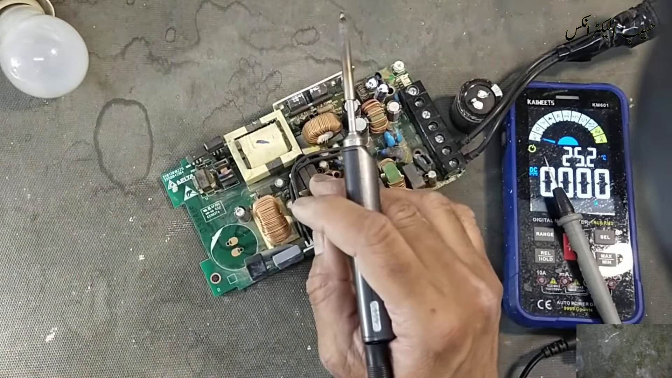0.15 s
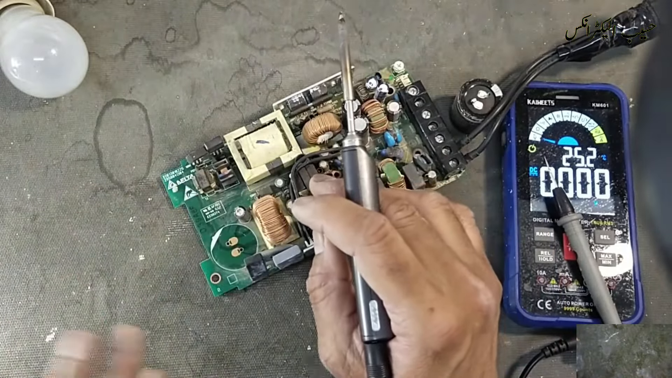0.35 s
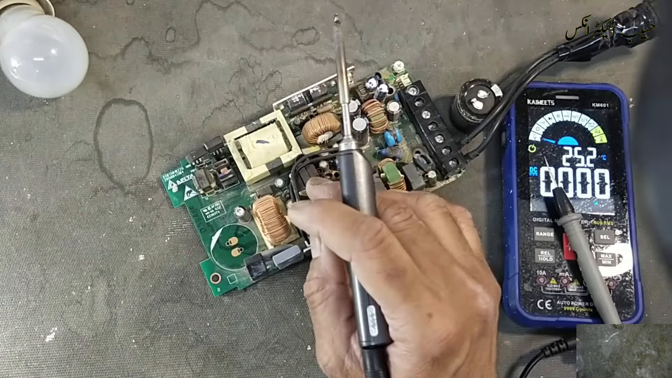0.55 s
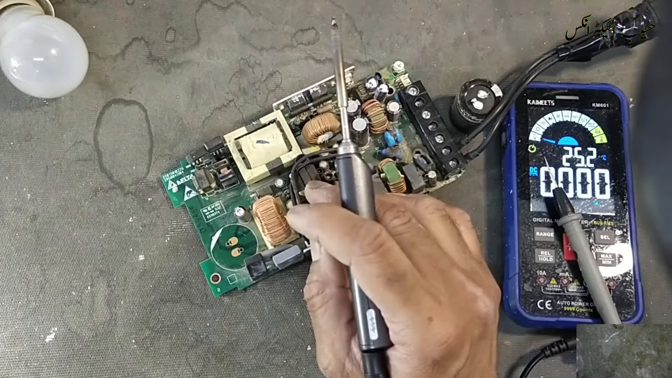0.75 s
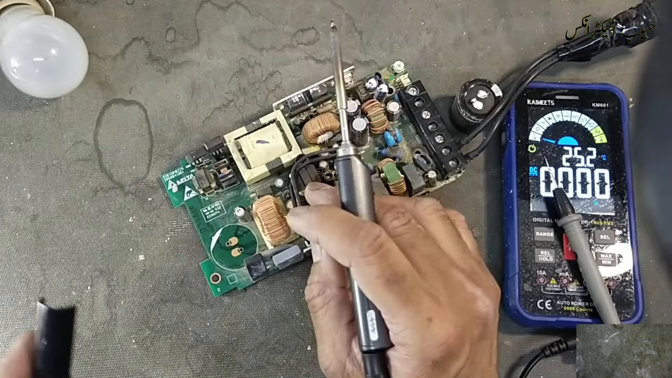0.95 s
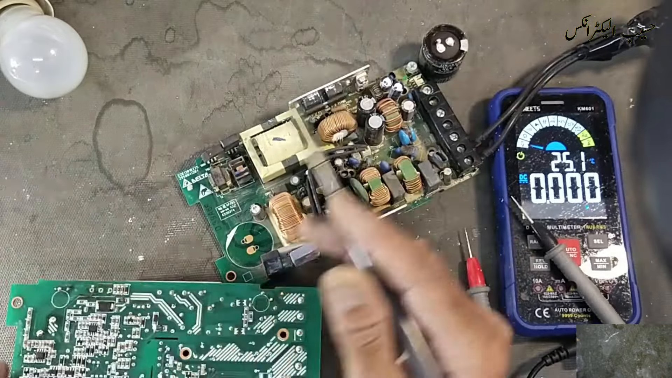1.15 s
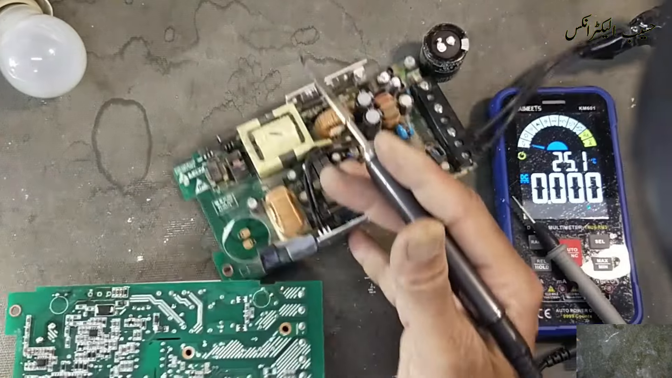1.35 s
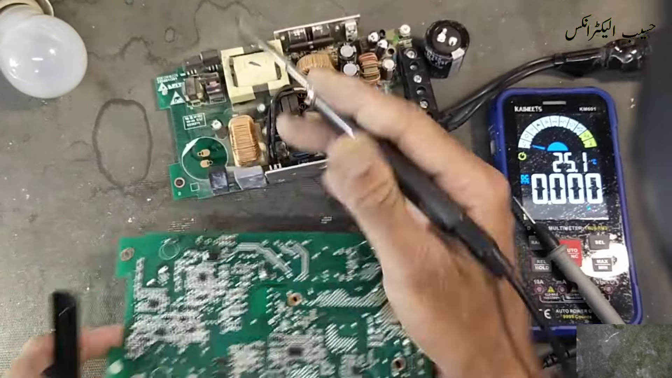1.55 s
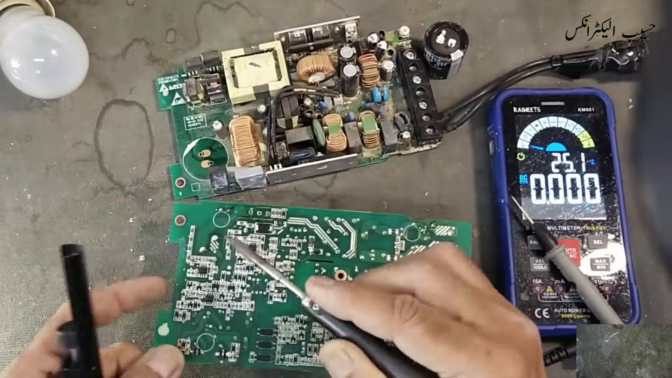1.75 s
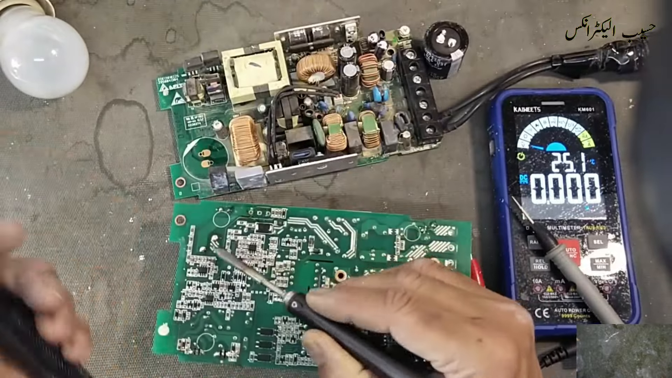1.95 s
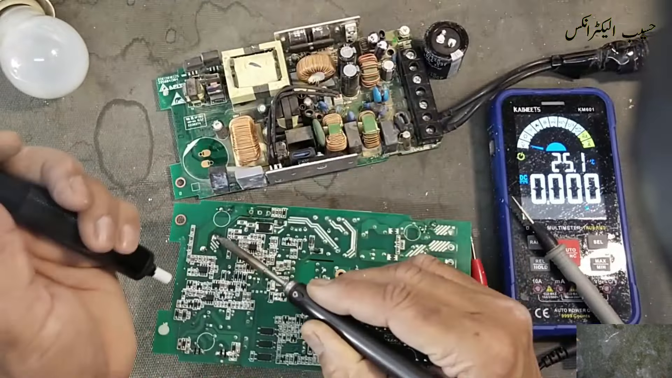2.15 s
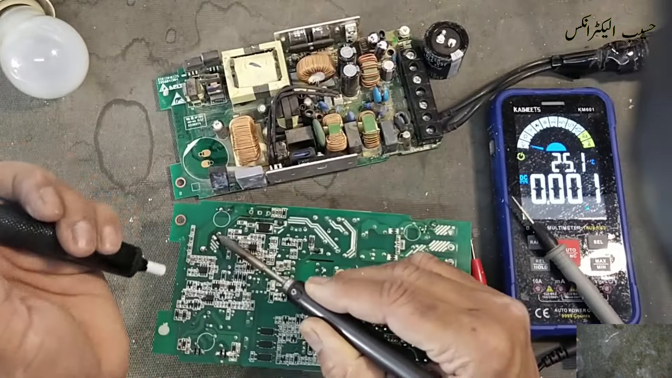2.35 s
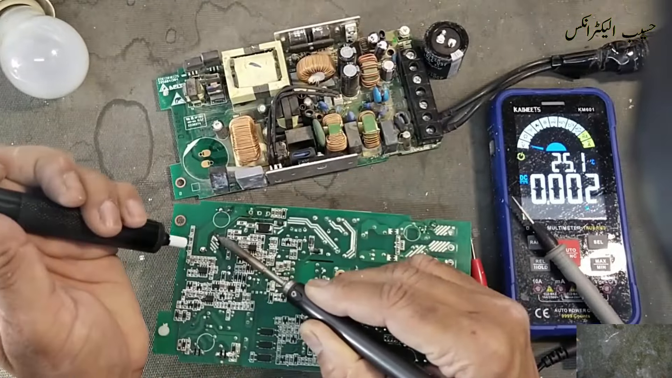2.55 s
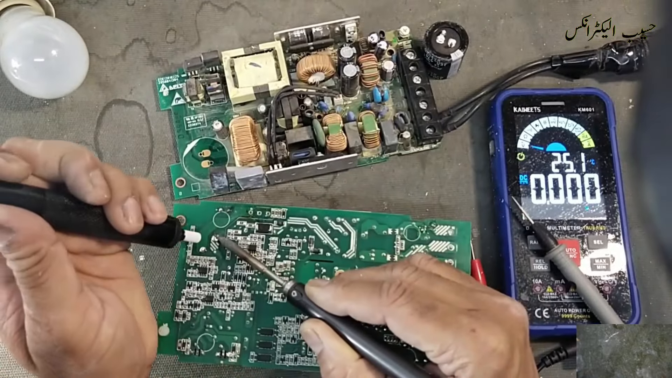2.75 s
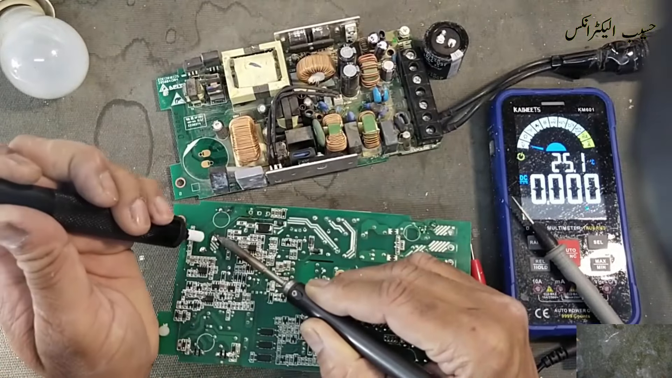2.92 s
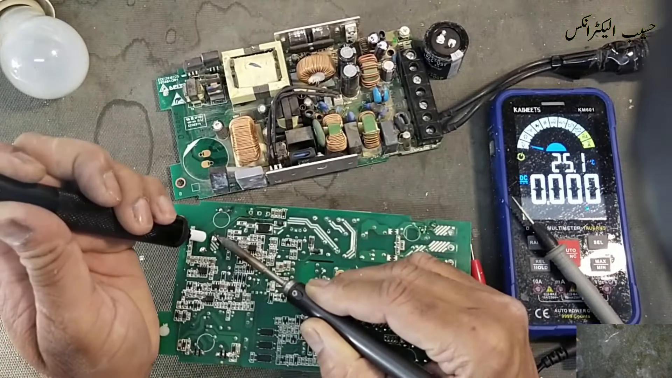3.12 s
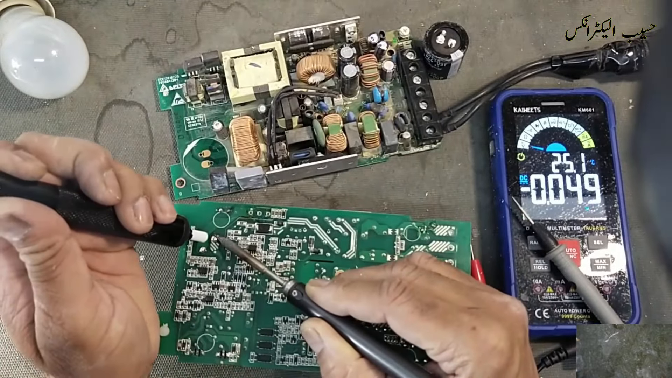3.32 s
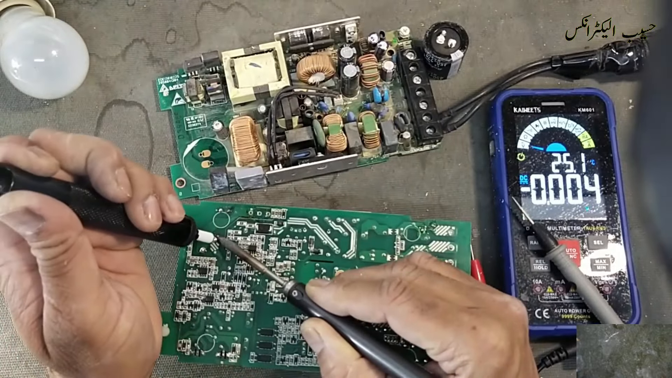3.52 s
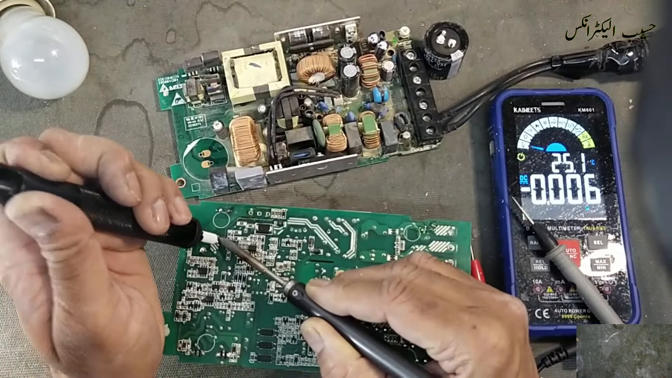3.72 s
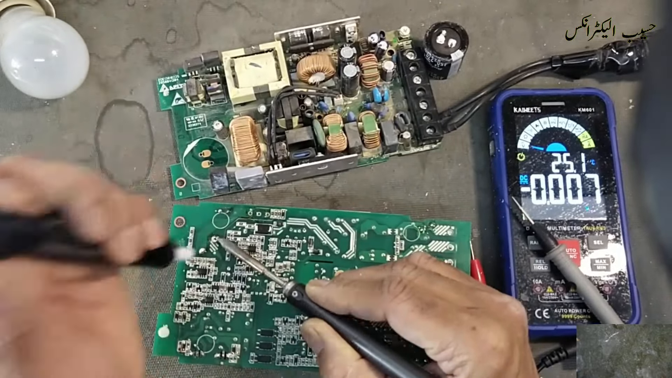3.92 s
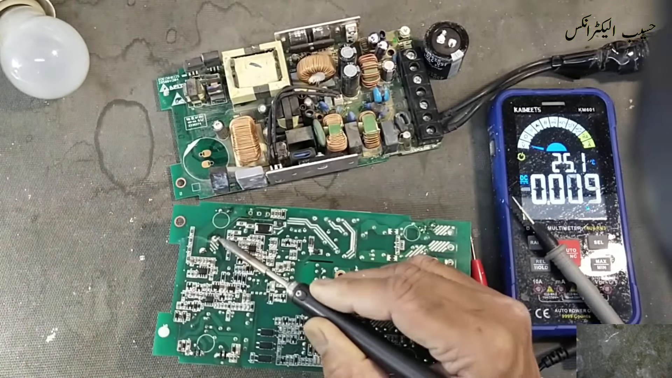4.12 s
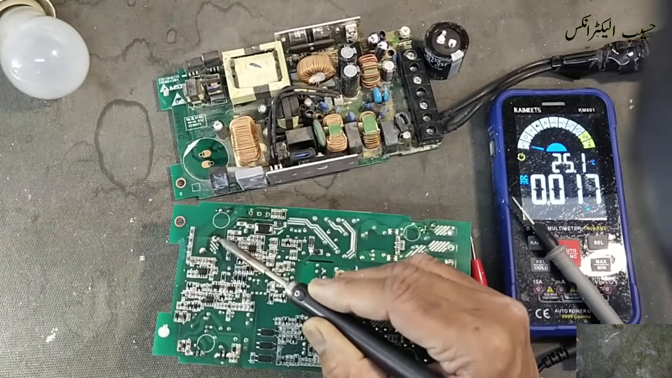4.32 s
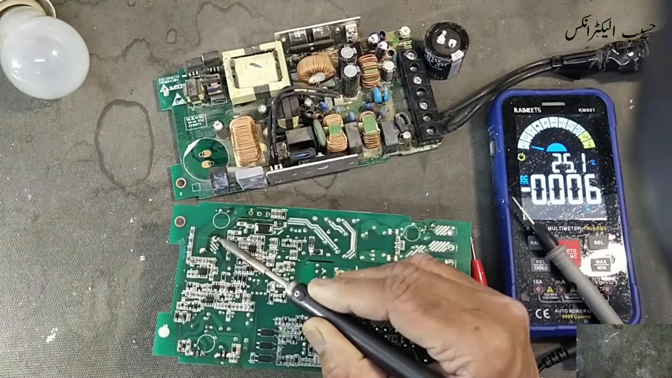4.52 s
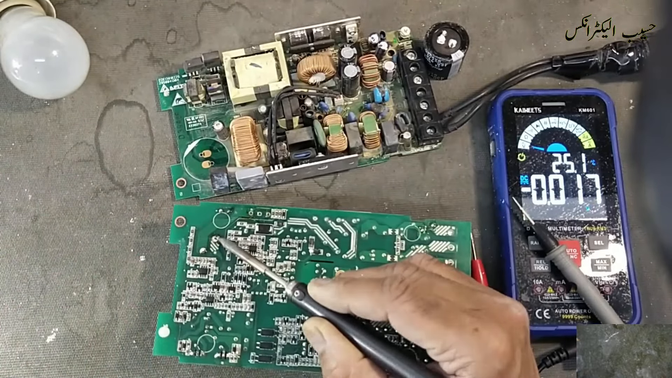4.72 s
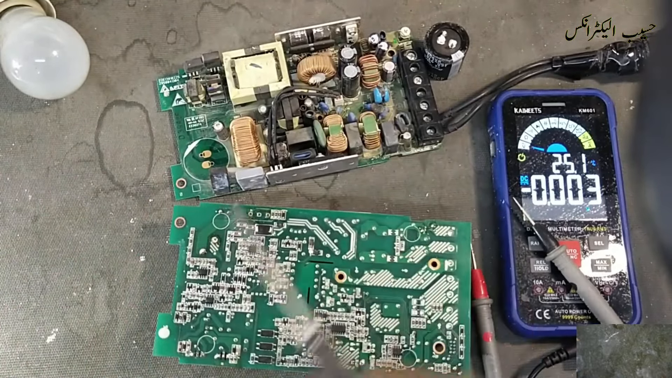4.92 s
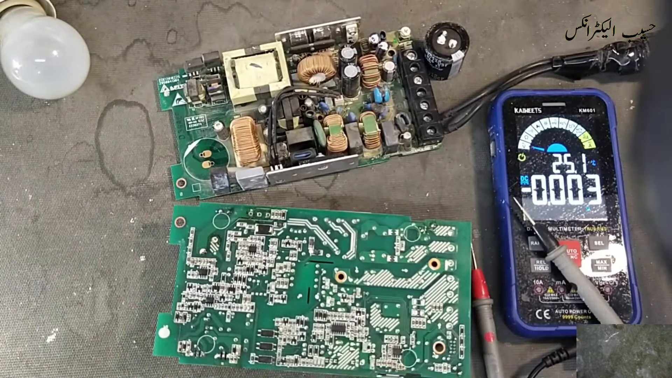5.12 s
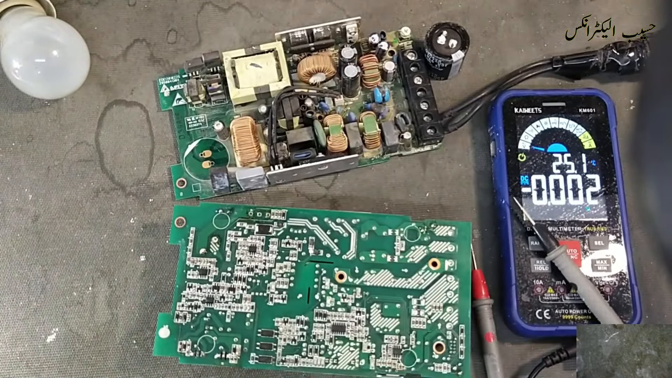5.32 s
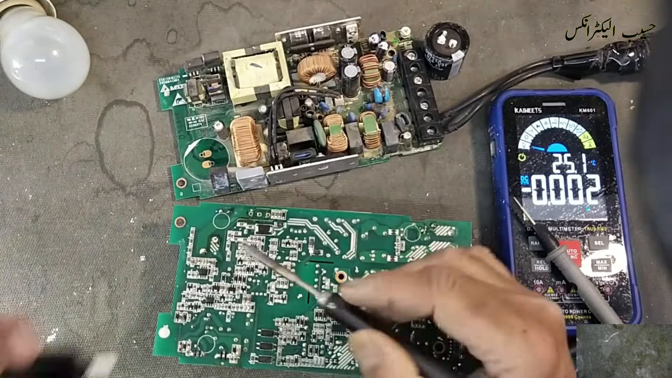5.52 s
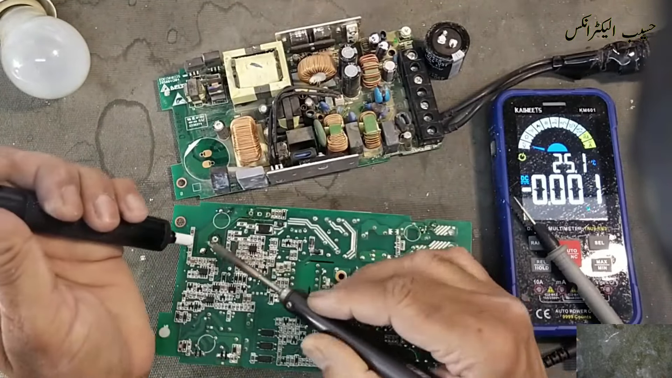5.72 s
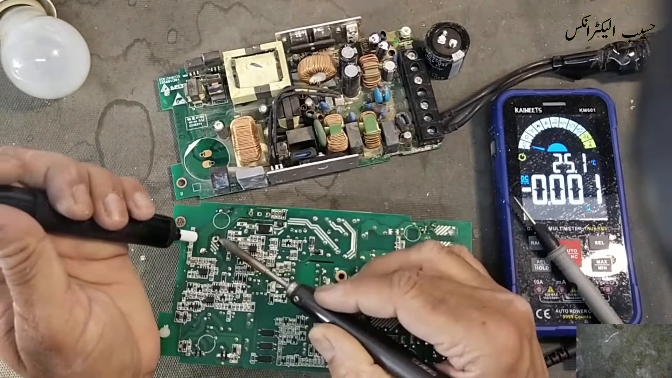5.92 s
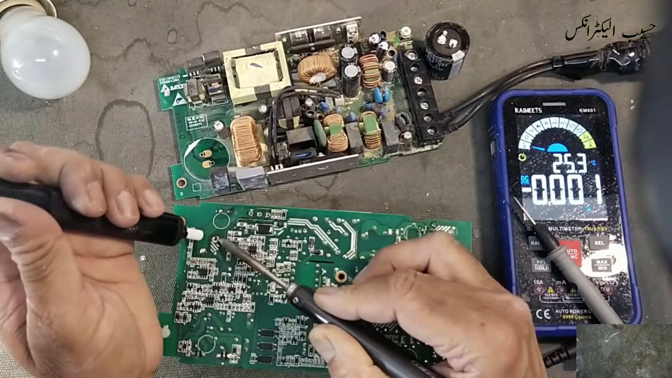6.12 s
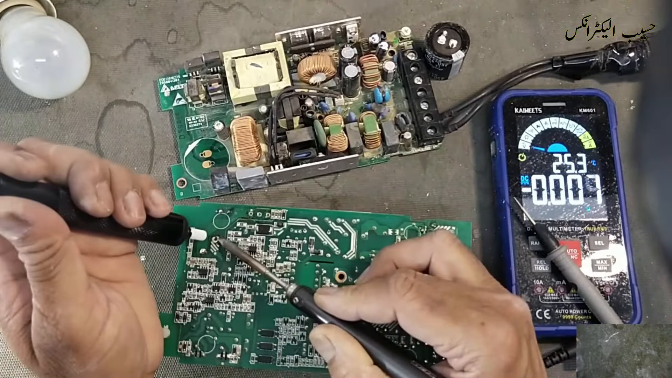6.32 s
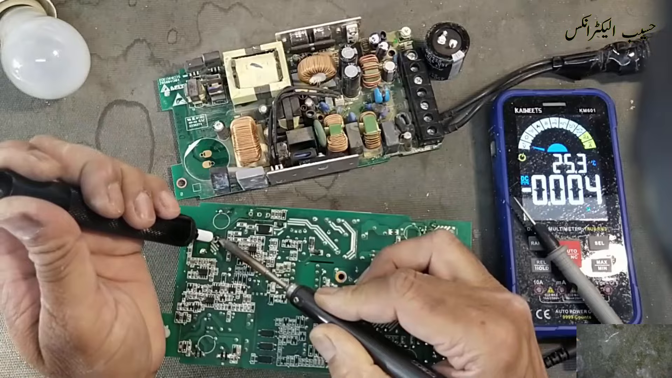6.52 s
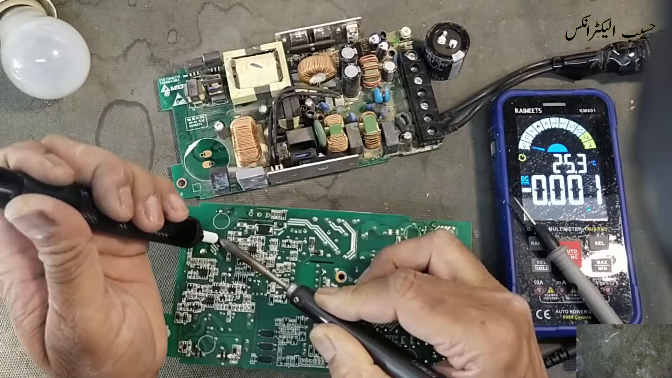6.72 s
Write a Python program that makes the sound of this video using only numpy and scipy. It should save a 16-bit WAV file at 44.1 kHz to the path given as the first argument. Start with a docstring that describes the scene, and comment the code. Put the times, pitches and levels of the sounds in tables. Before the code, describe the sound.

Close, dry stereo in a small quiet room with soft low air and a thin hiss. From 0 to 1 s, short gritty scrapes of board and tools on a bench mat, with light knocks around 0.4 s and a quick upward swipe near 0.5 s. Small bumps at 1.1-1.3 s; a raspy drag swells from 1.4 s into the heaviest thuds at 1.5 and 1.65 s, then a hollow ringing knock at 1.8 s. A faint tap at 2.3 s, then near silence. At 3.8 s a loud, very short pump snap, bright and plasticky, with spring rattle and a low bench boom. Tiny ticks and thin metallic pings from 3.9 to 4.6 s, taps at 4.8 s, a double latch click just before 5 s, and knocks to 5.5 s. Quiet, with a barely audible whistle and squeak after 6.3 s, until a much softer snap at 6.75 s.

```python
"""A circuit board drags over a workbench and is set down; then a spring-loaded desoldering pump snaps,
is pushed back until it latches, and snaps again, with taps and clinks in between.
Pump, latch, taps and slides are gritty noise shaped by force envelopes, spectra and resonances.
Bumps and recoil ring the bench as decaying sines; pins, nozzle and joint are gliding narrow noise.
A short noise tail makes the small room, over quiet air."""
import sys
import numpy as np
from scipy import signal
from scipy.fft import rfft, irfft, next_fast_len
from scipy.io import wavfile
from scipy.ndimage import uniform_filter1d

SR = 44100
rng = np.random.default_rng(int(sys.argv[2]) if len(sys.argv) > 2 else 0)


def wav_record(signal):
    """Record a signal, one row per channel, as 16-bit PCM in the file named by sys.argv[1]."""
    frames = np.transpose(np.atleast_2d(signal))
    bounded = np.clip(frames, -1, 1)
    # unit amplitude maps onto the largest positive 16-bit level
    quanta = np.round(bounded * 32767).astype(np.int16)
    wavfile.write(sys.argv[1], SR, quanta)


N = 298116
TIME = np.arange(N) / SR


def snap(strokes, spectrum, modes, rise_s, fall_s, grain_db, rattle_db, rattle_s):
    """The plunger scrapes along the barrel, sets the body ringing, and its spring rattles on unevenly."""
    force, rattle = 0, 0
    for s, db, length_s in strokes:
        force = force + from_db(db) * burst(TIME - s, length_s, rise_s, fall_s)
        rattle = rattle + from_db(db + rattle_db) * burst(TIME - s - length_s, 0, rise_s, rattle_s)
    scrape = force * grit(grain_db, grain_s=0.00042)
    spring = rattle * grit(grain_db=5, grain_s=0.0016)
    out = colour(scrape + spring, spectrum)
    for s, db, length_s in strokes:
        for hz, mode_db, t60_s in modes:
            phase = rng.uniform(0, 2 * np.pi, (2, 1))
            add(out, s + length_s / 2, from_db(db + mode_db) * ring(TIME[:SR], hz, t60_s, phase))
    return out


# pump shots: (time [s], level [dB], plunger travel [s])
PUMP_SHOTS = [(3.785, -18.5, .014), (6.758, -30.5, .014)]
# air and plunger noise in the barrel: (frequency [Hz], relative density [dB per Hz])
BARREL_SPECTRUM = [(40, -46.5), (110, 3), (240, -2.5), (420, -1.5), (750, -4.5), (1250, -6), (1850, 6.5),
                   (2500, -6.5), (4200, -1), (5800, -12.5), (7200, -1), (8500, -6), (11000, -9),
                   (15500, -9.5)]
# pump body: (frequency [Hz], level [dB], t60 [s])
BODY_MODES = [(450, -23, .25), (549, -20, .22), (1502, -20, .13), (1655, -16, .12), (1712, -20, .14),
              (1826, -10.5, .09), (1939, -19, .1), (2055, -15, .1), (2981, -17, .1), (3534, -13, .1),
              (4062, -14, .11), (7101, -14, .06), (7208, -10, .065), (7451, -11, .075), (7977, -19, .09)]
# air column in the barrel: (frequency [Hz], width [Hz], level [dB])
CAVITY_MODES = [(1820, 260, 0.5), (6800, 700, 1.5)]


def pump():
    """The released plunger scrapes and rings the body; the barrel's air column resonates with it."""
    shots = snap(PUMP_SHOTS, BARREL_SPECTRUM, BODY_MODES, rise_s=0.0035, fall_s=0.0011,
                 grain_db=2.0, rattle_db=-6.5, rattle_s=0.0095)
    return from_db(-0.5) * (shots + from_db(-8) * resonate(shots, CAVITY_MODES))


# plunger pushed back over its catch: (time [s], level [dB], length [s])
LATCH_STROKES = [(4.981, -32, 0.012), (4.990, -31, 0.00463)]
# catch noise: (frequency [Hz], relative density [dB per Hz])
CATCH_SPECTRUM = [(80, -4.5), (300, -19), (1000, -5.5), (1900, -8.5), (2300, 4), (3100, 7), (3800, -0.5),
                  (4900, 2.5), (6000, -2), (7800, 6), (9500, 2.5), (12000, -7), (14500, 2), (16000, -10)]
# catch ringing: (frequency [Hz], level [dB], t60 [s])
CATCH_RINGS = [(2309, -17, .17), (3052, -14, .13)]


def latch():
    """The plunger scrapes over its catch in two close strokes, which ring it and rattle the spring."""
    return snap(LATCH_STROKES, CATCH_SPECTRUM, CATCH_RINGS, rise_s=0.0048, fall_s=0.0047,
                grain_db=4.5, rattle_db=-11.5, rattle_s=0.013)


# taps of board and tools:
# (time [s], contact length [s], body knock level [dB], knock pitch [Hz], bright tip tick level [dB])
TAP_EVENTS = [(0.405, .004, -46, 750, -66), (0.435, 0.0067, -38, 795, -66), (1.067, 0.011, -51, 750, -56.5),
              (1.195, 0.021, -52, 700, -50), (1.536, 0.0057, -28.5, 940, -58),
              (1.667, 0.017, -45.5, 900, -38.5), (1.825, .014, -26.5, 420, -54.5),
              (2.338, 0.014, -39, 760, -72), (3.924, 0.0042, -48, 1500, -40.5),
              (4.207, 0.034, -69, 1900, -53.5), (4.273, 0.013, -69, 2200, -46),
              (4.446, 0.018, -62.5, 1500, -53), (4.47, 0.052, -76, 1500, -57),
              (4.524, 0.0098, -53.5, 960, -58), (4.583, 0.013, -47, 724, -50.5),
              (4.622, 0.019, -53, 1110, -52), (4.836, .008, -45.5, 1003, -42),
              (4.888, 0.058, -48.5, 554, -52.5), (5.099, 0.0048, -41, 1460, -41.5),
              (5.232, 0.017, -39, 644, -49), (5.474, 0.033, -57.5, 395, -60),
              (6.749, 0.035, -37, 1260, -43.5)]
# knock of the body: (multiple of the knock pitch [ratio], relative density [dB per Hz])
KNOCK_SPECTRUM = [(.1, -19.5), (.55, 1.5), (1, 1), (2, -5), (4, -17), (8, -32), (25, -66)]
# tick of the tip: (frequency [Hz], relative density [dB per Hz])
TICK_SPECTRUM = [(50, -47), (400, -22.5), (1000, -8), (3000, 2.5), (5500, -3.5), (7500, -1), (10000, -9),
                 (16000, -13.5)]


def taps(rise_s, rise_share, knock_fall_s, tick_fall_s):
    """Each tap is a short gritty scuff, part knock and part tick; brief contacts start more sharply."""
    out, t = np.zeros((2, N)), TIME[:SR // 4]
    lead_s = .03   # room for the rise before contact
    body = grit(grain_db=1, grain_s=.0009)
    tip = grit(grain_db=1.0, grain_s=0.0013)
    for k, (s, length_s, knock_db, knock_hz, tick_db) in enumerate(TAP_EVENTS):
        part = k * len(t) // 2 + np.arange(len(t))
        rise = rise_s + rise_share * length_s
        knock_spectrum = [(knock_hz * ratio, db) for ratio, db in KNOCK_SPECTRUM]
        knock = colour(body[:, part] * burst(t - lead_s, length_s, rise, knock_fall_s), knock_spectrum)
        tick = colour(tip[:, part] * burst(t - lead_s, length_s, rise, tick_fall_s), TICK_SPECTRUM)
        add(out, s - lead_s, from_db(knock_db) * knock + from_db(tick_db) * tick)
    return out


# bench top: (frequency [Hz], width [Hz], level [dB])
JUDDER_MODES = [(79, 2.4, 5.5), (98.2, 3.5, -2.5), (125.3, 9, 9.5), (161, 18, 6.5)]


def judder(even_s):
    """Stick and slip shake the low modes of the bench top, at an even strength."""
    low = signal.sosfilt(signal.butter(2, [65, 200], "band", fs=SR, output="sos"), noise())
    shake = resonate(low, JUDDER_MODES)
    power = uniform_filter1d(np.mean(shake ** 2, axis=0), int(even_s * SR))
    return shake / np.sqrt(power + 1e-12)


# things sliding over the bench:
# (time [s], length [s], level [dB], swell over the stroke [dB], weight [dB], brightness [dB])
SLIDE_STROKES = [(0.0, 0.038, -45.5, -2.5, -1.5, -2), (0.063, .3, -53, -9, -0.5, -1),
                 (0.437, 0.041, -44.5, 1, 0, -10), (0.5, 0.063, -40, -1, -6, 3),
                 (0.607, .33, -55, -7.5, 5, 3.5), (1.377, 0.14, -47, 12, 8, -4.5),
                 (1.545, 0.11, -44.5, 7.5, 17, 0), (1.72, 0.085, -52.5, 2, 16, -3),
                 (2.276, 0.042, -74, 5, 13, -18), (2.378, 0.18, -67, -13.5, 2.5, -15.5)]
# low, middle and high friction noise, each: (frequency [Hz], relative density [dB per Hz])
RUB_SPECTRUM = [(170, -36), (290, 1), (540, 0), (700, -7.5), (1100, -3), (1800, -19)]
SCRATCH_SPECTRUM = [(700, -25.5), (1350, 4.5), (2000, 3.5), (2900, 5), (4000, -4), (6000, -11)]
HISS_SPECTRUM = [(3000, -16), (4600, 0.5), (5700, -9), (7300, 1.5), (9000, -4), (12000, -7.5),
                 (15500, -1.5)]
RUB_DB, HISS_DB = -2.5, 0   # relative to the scratch; brightness trades rub for hiss
SLIDE_TOP_HZ, DULLING_DB = 16600, 11   # top at zero weight; this much more weight halves it
# quick swipe rising in pitch: (time [s], length [s], first pitch [Hz], last pitch [Hz])
SWIPE_GLIDE = (.446, .125, 1300, 2600)
SWIPE_DB = -35


def slides(grain_db, rise_s, fall_s):
    """Solder pins and plastic drag on the mat: gritty friction over judder; weight deepens and dulls it."""
    lumps = uneven(spread_db=1.5, step_s=.012)
    rub, scratch, hiss = [lumps * colour(grit(grain_db, grain_s=.003), spectrum)
                          for spectrum in (RUB_SPECTRUM, SCRATCH_SPECTRUM, HISS_SPECTRUM)]
    shake, out = judder(even_s=0.025), 0
    for s, length_s, db, swell_db, weight_db, bright_db in SLIDE_STROKES:
        progress = np.clip((TIME - s) / length_s, 0, 1)
        force = from_db(db + swell_db * progress) * burst(TIME - s, length_s, rise_s, fall_s)
        drag = from_db(weight_db) * shake + scratch
        drag = drag + from_db(RUB_DB - bright_db) * rub + from_db(HISS_DB + bright_db) * hiss
        top_hz = min(SLIDE_TOP_HZ * 2 ** (-weight_db / DULLING_DB), .45 * SR)
        out = out + signal.lfilter(*signal.butter(1, top_hz, fs=SR), force * drag)
    swipe = glide(SWIPE_GLIDE, SWIPE_DB, width_hz=830, rise_s=0.013, fall_s=0.0085)
    return out + lumps * swipe


# solder pins as the board starts to move: (time [s], length [s], first pitch [Hz], last pitch [Hz])
RASP_GLIDE = (1.372, .147, 3050, 3150)
RASP_DB = -43.5


def pin_rasp():
    """Solder pins rasp as the board starts to move: a broad resonance that swells and rises slightly."""
    return glide(RASP_GLIDE, RASP_DB, width_hz=1600, rise_s=0.0054, fall_s=0.0072, swell_db=9)


# circuit board: (frequency [Hz], width [Hz], level [dB])
BOARD_MODES = [(305.5, 5.1, 2), (547.5, 4.5, 3), (747, 4.6, -4.5), (1039, 10, -9), (1188, 28, -2.5),
               (1770, 20, 0.5), (2179, 7.7, 0), (2800, 17, -3.5), (3554, 21, -12.5), (6810, 310, -2.5)]


def handling():
    """Taps and slides ring the circuit board; the pin rasp sounds beside them."""
    contacts = taps(rise_s=0.0005, rise_share=0.12, knock_fall_s=0.0099, tick_fall_s=.008)
    contacts = contacts + slides(grain_db=0.5, rise_s=.009, fall_s=.018)
    return from_db(-2.5) * (contacts + resonate(contacts, BOARD_MODES)) + pin_rasp()


# thin metal and board edges left ringing: (time [s], pitch [Hz], level [dB])
PING_EVENTS = [(1.108, 385, -37.5), (1.192, 1060, -44.5), (1.495, 563.5, -23), (1.590, 1365, -37),
               (1.824, 468, -23), (3.867, 1740, -51), (4.210, 1835, -52.5), (4.230, 4170, -46.5),
               (4.282, 4096, -35), (4.621, 552, -32.5), (4.626, 2200, -49), (4.841, 1233, -41),
               (5.100, 896, -45.5), (5.238, 607, -36), (5.240, 781, -33), (5.336, 4120, -56.5)]
PING_T60_S = 0.14


def pings(spread_rad, rise_s):
    """Some taps leave a ring, which swells during the contact and reaches the two ears out of step."""
    out = np.zeros((2, N))
    phase = np.array([[spread_rad], [0]])
    for s, hz, db in PING_EVENTS:
        tone = ring(TIME[:SR], hz, PING_T60_S, phase, rise_s * hz)
        add(out, s - rise_s / 2, from_db(db) * tone)
    return out


# bumps that reach the bench: (time [s], thud level [dB], boom level [dB], phase between the ears [rad])
BENCH_BUMPS = [(0.4, -33, -47, 0), (0.435, -25, -33.5, 0.5), (0.591, -65, -38, -0.5),
               (1.06, -27.5, -31.5, 0.2), (1.184, -24, -41, 3.5), (1.285, -24, -53, 3.5),
               (1.504, -10, -39, 0.5), (1.654, -6, -25, 0.5), (1.69, -34, -21.5, 0.15),
               (1.817, -41, -27, 1), (2.332, -53, -44.5, 4.5), (3.711, -34, -58, 2), (4.444, -54, -51, 1.5),
               (4.844, -30.5, -33, 1.5), (4.877, -37, -42, 1.5), (5.236, -59, -47.5, -5.5),
               (5.465, -53, -38.5, 3.5), (5.848, -51.5, -51.5, 1.5)]
THUD_HZ, THUD_T60_S, BOOM_HZ = 111, 0.12, 165
HELD_T60_S, FREE_T60_S = .31, 0.58   # the boom under a resting hand, and after a pump shot
RECOIL_THUD_DB, RECOIL_BOOM_DB, RECOIL_EARS_RAD = 0, -0.5, -2.31   # levels relative to the shot


def bench(soft_cycles):
    """Bumps and the pump's recoil give a dead thud and a longer boom."""
    out, t = np.zeros((2, N)), TIME[:SR]
    blows = [(*bump, HELD_T60_S) for bump in BENCH_BUMPS]
    blows += [(s, db + RECOIL_THUD_DB, db + RECOIL_BOOM_DB, RECOIL_EARS_RAD, FREE_T60_S)
              for s, db, _ in PUMP_SHOTS]
    for s, thud_db, boom_db, apart_rad, boom_t60_s in blows:
        ears = np.array([[apart_rad], [-apart_rad]]) / 2
        thud = from_db(thud_db) * ring(t, THUD_HZ, THUD_T60_S, ears, soft_cycles)
        boom = from_db(boom_db) * ring(t, BOOM_HZ, boom_t60_s, ears, soft_cycles)
        add(out, s, thud + boom)
    return signal.sosfilt(signal.butter(2, 55, "high", fs=SR, output="sos"), out)


# nozzle on the board: (time [s], length [s], first pitch [Hz], last pitch [Hz])
SQUEAK_GLIDE = (6.5, .19, 484, 500)
SQUEAK_DB = -69


def nozzle_squeak():
    """The nozzle squeaks faintly and low on the board: a narrow resonance rising slightly."""
    return glide(SQUEAK_GLIDE, SQUEAK_DB, width_hz=40, rise_s=0.078, fall_s=0.051)


# hot joint: (time [s], length [s], first pitch [Hz], last pitch [Hz])
WHISTLE_GLIDE = (6.27, .39, 8680, 8740)
WHISTLE_DB = -80.5


def joint_whistle():
    """A faint whistle at the hot joint: a narrow high resonance rising slightly."""
    return glide(WHISTLE_GLIDE, WHISTLE_DB, width_hz=90, rise_s=.05, fall_s=.04)


# short tail: (frequency [Hz], relative density [dB])
ROOM_SPECTRUM = [(60, -16), (200, 1), (500, 6.5), (1500, 1.5), (5000, 2.5), (9000, 0.5), (16000, -1.5)]
# late tail: (frequency [Hz], relative density [dB])
SHIMMER_SPECTRUM = [(1000, 7), (2000, -9), (5500, -12.5), (7400, -12), (9000, -26), (16000, -31)]
ROOM_T60_S, ROOM_DB = 0.23, -9


def room(x, shimmer_db, shimmer_t60_s):
    """A short diffuse tail, and a faint shimmer that hangs on after it."""
    t = TIME[:2 * SR]
    tail = colour(noise(size=len(t)), ROOM_SPECTRUM) * np.exp(-np.log(1000) * t / ROOM_T60_S)
    tail = tail * (t > .004)   # gap before the first reflection
    shimmer = colour(noise(size=len(t)), SHIMMER_SPECTRUM) * np.exp(-np.log(1000) * t / shimmer_t60_s)
    response = from_db(ROOM_DB) * rms_one(tail) + from_db(shimmer_db) * rms_one(shimmer)
    return convolve(x, response / np.sqrt(len(t)))


# room air: (frequency [Hz], relative density [dB per Hz])
AIR_SPECTRUM = [(15, -35.5), (25, -10), (43, -25.5), (75, -12), (113, -2.5), (183, -6), (297, -8.5),
                (457, -9.5), (567, -12.5), (741, -13.5), (1170, -16), (1710, -17.5), (2360, -18.5),
                (15500, -27)]
# room air: (time [s], level [dB])
AIR_LEVEL = [(0, -59.5), (1.2, -57), (2.1, -61.5), (2.8, -65), (4.8, -63), (6.76, -65.5)]
THIN_HISS_HZ, THIN_HISS_DB = 7570, -14.5   # relative to the air


def background():
    """Room air with a thin high band in it; both rise and sink together."""
    level = from_db(np.interp(TIME, *np.transpose(AIR_LEVEL)))
    thin_hiss = from_db(THIN_HISS_DB) * narrow(THIN_HISS_HZ, width_hz=1000)
    return level * (colour(noise(), AIR_SPECTRUM) + thin_hiss)


def burst(t, length_s, rise_s, fall_s):
    """Force of a contact: swells up to t = 0, holds, dies."""
    rise = np.minimum(t, 0) / rise_s
    fall = np.maximum(t - length_s, 0) / fall_s
    return np.exp(np.maximum(rise - fall, -40))


def ring(t, hz, t60_s, phase=0, rise_cycles=0.63):
    """A mode struck at t = 0; a soft contact takes some cycles to build it up."""
    build_up = 1 - np.exp(-(t * hz / rise_cycles) ** 2)
    decay = np.exp(-np.log(1000) * t / t60_s)
    return build_up * decay * np.sin(2 * np.pi * hz * t + phase)


def resonate(x, modes):
    """Parallel resonances, rows of (frequency [Hz], width [Hz], level [dB])."""
    return sum(from_db(db) * signal.lfilter(*signal.iirpeak(hz, hz / width_hz, fs=SR), x)
               for hz, width_hz, db in modes)


def glide(gesture, db, width_hz, rise_s, fall_s, swell_db=0):
    """A resonance comes in, slides evenly from one pitch to another, and dies."""
    s, length_s, first_hz, last_hz = gesture
    progress = np.clip((TIME - s) / length_s, 0, 1)
    force = from_db(db + swell_db * progress) * burst(TIME - s, length_s, rise_s, fall_s)
    return force * narrow(first_hz * (last_hz / first_hz) ** progress, width_hz)


def narrow(hz, width_hz):
    """Noise in one resonance, steady or moving: slow complex noise on a carrier."""
    white = rng.standard_normal((2, N)) + 1j * rng.standard_normal((2, N))
    wobble = signal.sosfilt(signal.butter(2, width_hz / 2, fs=SR, output="sos"), white)
    carrier = np.exp(2j * np.pi * np.cumsum(hz * np.ones(N)) / SR)
    return rms_one((wobble * carrier).real)


def grit(grain_db, grain_s):
    """Noise made of tiny catches."""
    return rms_one(noise() * uneven(grain_db, grain_s))


def uneven(spread_db, step_s):
    """A gain that wanders by chance from one catch of the surfaces to the next."""
    knots = np.arange(0, N / SR, max(step_s, 1e-4))
    wander = np.interp(TIME, knots, rng.standard_normal(len(knots)))
    return rms_one(from_db(spread_db * wander))


# stereo noise: (frequency [Hz], left-right likeness [correlation])
EAR_LIKENESS = [(30, 1), (110, 0.32), (300, 0.13), (1000, 0.066), (3000, 0), (16000, 0)]


def noise(size=N):
    """White stereo noise, alike at both ears only in the bass."""
    padded = next_fast_len(size)
    alike = np.clip(at_hz(EAR_LIKENESS, np.fft.rfftfreq(padded, 1 / SR)), -1, 1)
    mid, side = rfft(rng.standard_normal((2, padded)))
    ears = np.sqrt(1 + alike) * mid + np.sqrt(1 - alike) * side * [[1], [-1]]
    return rms_one(irfft(ears, padded)[:, :size])


def colour(x, spectrum, size=4096):
    """Causal (minimum-phase) filter with the given spectrum and unit power gain."""
    cepstrum = irfft(np.log(from_db(at_hz(spectrum, np.fft.rfftfreq(size, 1 / SR)))))
    response = irfft(np.exp(rfft(2 * cepstrum[:size // 2], size)))
    return convolve(x, response / np.linalg.norm(response))


def at_hz(points, hz):
    """Reads a spectrum on a log-frequency axis."""
    f, value = np.transpose(points)
    return np.interp(np.log(np.maximum(hz, 1)), np.log(f), value)


def convolve(x, response):
    """Filters x with an impulse response, keeping its length."""
    return signal.fftconvolve(x, np.atleast_2d(response), axes=-1)[:, :x.shape[-1]]


def add(out, s, x):
    """Mixes x in from time s."""
    i = max(round(s * SR), 0)
    out[:, i:i + x.shape[-1]] += x[:, :max(N - i, 0)]


def from_db(db):
    """Decibels to amplitude."""
    return 10 ** (np.asarray(db) / 20)


def rms_one(x):
    """Scales x to unit RMS."""
    return x / np.sqrt(np.mean(x ** 2) + 1e-20)


def scene():
    """Pump and handling sound close by and in the room; the bench booms under them."""
    close = pump() + latch() + handling()
    # small things radiate no deep bass
    near = signal.sosfilt(signal.butter(2, 65, "high", fs=SR, output="sos"), close)
    reverb = room(near, shimmer_db=-40.0, shimmer_t60_s=2.9)
    ringing = pings(spread_rad=1.72, rise_s=.004) + bench(soft_cycles=1.03)
    faint = joint_whistle() + nozzle_squeak()
    return near + reverb + ringing + faint + background()


LEFT_DB, RIGHT_DB, CUTOFF_HZ = -0.8, 0.32, 15900


def record(dry):
    """The right microphone is a little louder; the top is cut."""
    top_cut = signal.ellip(12, .1, 80, CUTOFF_HZ, fs=SR, output="sos")
    return signal.sosfilt(top_cut, dry * from_db([[LEFT_DB], [RIGHT_DB]]))


dry = scene()
out = record(dry)
wav_record(out)
```